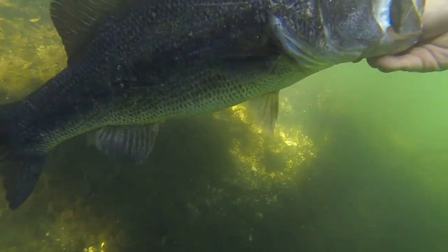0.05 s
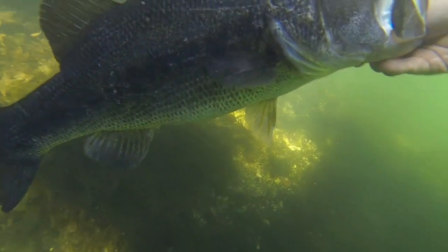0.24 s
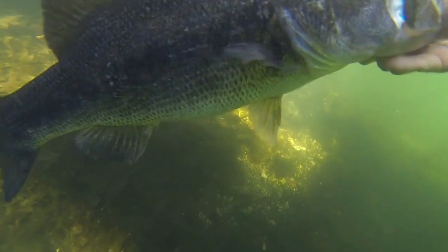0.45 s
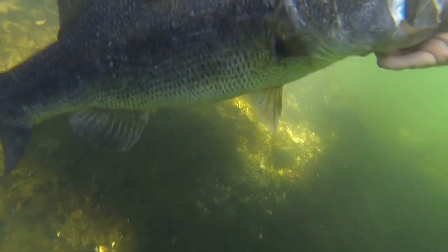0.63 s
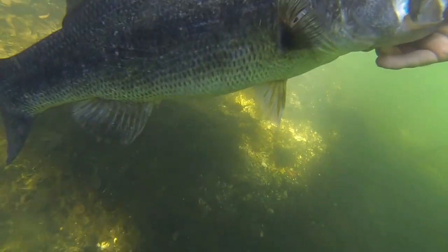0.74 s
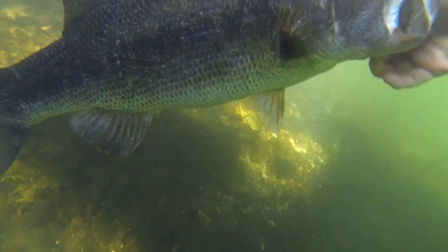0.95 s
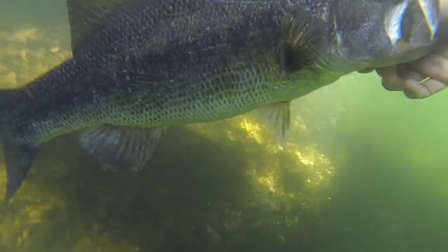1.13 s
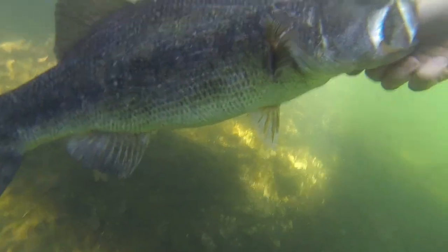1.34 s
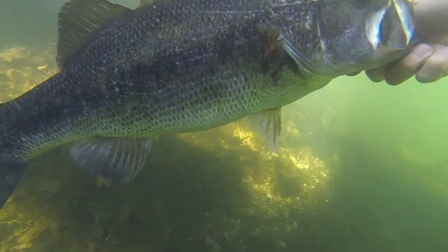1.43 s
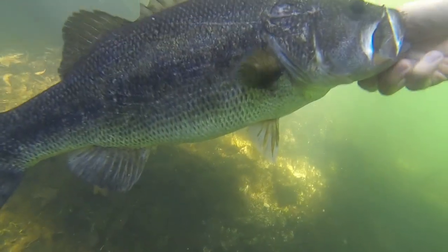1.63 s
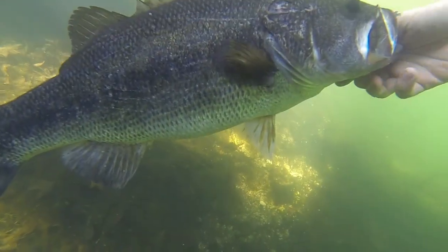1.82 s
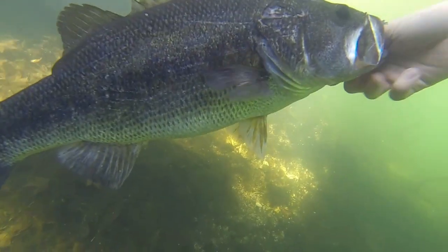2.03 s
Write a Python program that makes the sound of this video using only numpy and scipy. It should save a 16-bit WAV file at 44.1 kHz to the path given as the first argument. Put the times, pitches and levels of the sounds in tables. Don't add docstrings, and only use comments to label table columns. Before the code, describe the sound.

Heard from inside a sealed housing in shallow water: a rattling burst of hard clicks, scattered knocks, a brief finger squeak, scrape and groan, a final solid knock, with deep water rumble and faint hiss throughout.

```python
import sys
import numpy as np
from scipy import signal
from scipy.fft import rfft, irfft
from scipy.io import wavfile
from scipy.ndimage import uniform_filter1d

SR = 44100
rng = np.random.default_rng(int(sys.argv[2]) if len(sys.argv) > 2 else 0)


def unload_audio(sound):
    columns = np.transpose(np.atleast_2d(sound))
    steps = np.round(np.clip(columns, -1, 1) * 32767)
    wavfile.write(sys.argv[1], SR, steps.astype(np.int16))


def boost_factor(decibels):
    exponent = np.asarray(decibels, float) / 20
    return 10 ** exponent


N = 91683

# start_s, level_db, push_or_pull (1 or # -1),
# sharpness_s
THUMPS = [(0, -26, 1, 0.0014), (0.098, -30, 1, 0.00019), (0.157, -27, -1, 0.00089),
          (0.28, -19.5, 1, 0.0019), (0.474, -23, -1, 0.00013), (0.613, -28, -1, 0.0012),
          (0.7281, -28, -1, 0.0004), (0.754, -12.5, -1, 0.012), (.928, -15.5, -1, 0.00057),
          (0.951, -25.5, 1, 0.0014), (1.129, -28, -1, 0.00094), (1.365, -16, 1, 0.0059),
          (1.537, -32, 1, 0.0013), (0.052, -20, 1, 0.011), (0.193, -28.5, 1, 0.0076),
          (.339, -30.5, 1, 0.0079), (0.625, -26, 1, 0.0045), (1.029, -24, -1, 0.0036),
          (1.077, -21.5, -1, 0.0061), (1.123, -19, 1, 0.0074), (1.221, -23, -1, 0.0042),
          (1.286, -19.5, 1, 0.01), (1.35, -26, -1, 0.0027), (1.546, -16.5, 1, 0.012),
          (1.803, -27, -1, 0.0075), (1.841, -30.5, 1, 0.0047), (1.893, -31, -1, 0.0052),
          (1.942, -29, 1, 0.0041)]
SLOSH_HZ, SLOSH_T60_S, SLOSH_DB = 34.1, 0.11, -6
# time_s, level_db
WATER_SWELL = [(0, -35), (.06, -23.5), (.21, -33), (.31, -28), (.5, -36.5), (.72, -24), (.86, -35),
               (1.05, -25), (1.3, -20), (1.44, -24.5), (1.55, -28), (1.68, -33.5), (1.85, -31), (2.08, -36)]
# freq_hz, density_db
WATER_SPECTRUM = [(8.8, 21.5), (15, 16), (91, -10), (113, -27.5), (141, -20), (222, -33), (251, -31.5),
                  (400, -65), (520, -105), (880, -120)]

# start_s, peak_db, ring_hz, middle_modes_db, crack_db
HOUSING_KNOCKS = [(.354, -33, 1880, -17, -9.5), (.387, -34, 1680, 7, -17), (.4424, -23, 2350, -4, -31),
                  (.4532, -10, 2560, -43, -30), (.4568, -18.5, 1540, 2.5, -37),
                  (.4692, -16.5, 3030, -7, -5), (.4743, -20.5, 2370, 20, -29), (.4804, -42, 2890, -3, -1),
                  (.4622, -41, 2900, -2, -25), (.4775, -36, 2850, 3, -14), (.5985, -36.5, 2120, -6, -15),
                  (.5905, -36, 2120, 4, 0.5), (.5955, -31.5, 2250, 15, -10.5),
                  (.6672, -19.5, 2500, 10, -12.5), (.6825, -32.5, 2230, 13, -1),
                  (.6846, -22.5, 1400, -6.5, -15), (.7806, -24.5, 1990, 3.5, -7.5),
                  (1.536, -36, 1410, -11, -24), (1.7478, -11.5, 1603, -3, -39)]
# start_s, peak_db, ring_hz, middle_modes_db, crack_db
FAINT_KNOCKS = [(0.0368, -41, 3480, -8, -9), (0.0712, -43.5, 3000, -8, -8), (0.0635, -47, 2640, -8, -11),
                (0.0964, -42.5, 1150, -22, -27), (0.185, -38.5, 1720, 8.5, -8),
                (0.3292, -36.5, 1350, -9, -17), (0.3362, -46, 1630, 6, -2), (0.3593, -40.5, 1590, 10, -12),
                (0.4009, -40, 2200, -18, -16), (0.4048, -50, 1540, -11, -6), (0.4381, -38, 2350, -3, -41),
                (0.5003, -43.5, 1220, 21, -17), (0.5104, -60, 1550, 5, -5), (0.5537, -54.5, 1530, 6, -21),
                (0.5845, -36, 2440, -15, -19), (0.6364, -40, 1750, -17, -30), (0.7216, -39.5, 930, -15, -30),
                (0.8616, -46, 1410, -3, -11), (0.889, -47.5, 1300, -1, -15), (0.3825, -41, 3300, 5, -10),
                (0.5475, -45.5, 2400, -8, -20), (1.4175, -53, 1600, 6, -25)]
# freq_hz, level_db, t60_s
CASE_MIDDLE_MODES = [(955, -16.5, 0.047), (1300, -45, 0.024), (1540, 16, 0.016), (2060, 28.5, 0.002),
                     (2500, 23.5, 0.0021), (3000, 22, 0.0019), (3080, 9, 0.0028)]
# freq_hz, width_hz, level_db
CASE_BRIGHT_MODES = [(5210, 1800, 6), (6330, 2300, 3), (8190, 950, -4.5), (9740, 1500, -9),
                     (12730, 4000, -28)]
RING_CYCLES, SWELL_CYCLES = 12, 0.92
RATTLE_S, RISE_S, CRACK_S = 0.0019, 0.00013, 0.00062
TAIL_DB, TAIL_T60_S = -16, 0.017
SCATTER_DB = 2.5
CASE_CUT_HZ, CASE_TOP_HZ = 950, 3800

# time_s, level_db
SQUEAK_PRESSURE = [(1.06, -82), (1.08, -56.5), (1.1, -54), (1.124, -33.5), (1.146, -37.5), (1.166, -55.5),
                   (1.187, -53), (1.21, -65.5), (1.26, -75)]
SCRAPE_PRESSURE = [(1.19, -57), (1.226, -51.5), (1.26, -53.5), (1.275, -37), (1.318, -33.5), (1.336, -39.5),
                   (1.378, -37), (1.396, -46), (1.408, -79)]
GROAN_PRESSURE = [(1.34, -62), (1.36, -44), (1.385, -41.5), (1.405, -48.5), (1.418, -72)]
SCUFF_PRESSURE = [(.025, -74), (.045, -62), (.06, -53), (.085, -50.5), (.1, -68)]
# freq_hz, width_hz, level_db
SQUEAK_BODY = [(790, 550, -16.5), (1234, 164, -10), (1511, 104, 2), (1776, 220, -17), (2420, 420, -29.5),
               (3180, 160, -25.5), (3600, 340, -22), (4890, 380, -29.5), (7850, 3800, -48)]
SCRAPE_BODY = [(258, 163, 2), (556, 153, 3), (900, 400, -2.5), (1290, 220, -2), (1600, 240, -4),
               (2330, 470, -13.5), (3300, 400, -10), (3995, 480, -23), (5320, 590, -22.5),
               (9500, 4800, -47)]
GROAN_BODY = [(275, 96, 4), (565, 130, -3), (715, 140, -7)]
SCUFF_BODY = [(352, 380, -2), (660, 330, -7), (1300, 540, -6)]
SLIPS_PER_S, SLIP_SPREAD_DB = 5000, 2

# start_s, pitch_hz, level_db, rise_s, t60_s
HOLLOW_NOTES = [
    (.438, 660, -32, .002, .03),
    (.6105, 660, -37, .002, .035),
    (.727, 600, -38, .001, .015),
    (1.119, 436, -19, .012, .085),
    (1.534, 620, -46, .002, .03),
]
# start_s, peak_db, centre_hz
SNAPS = [
    (0.15, -59, 14000),
    (0.4052, -48.5, 9500),
    (0.4486, -36, 13000),
    (0.4485, -41.5, 12000),
    (.4486, -45, 6500),
    (0.48, -47, 9500),
    (.596, -41.5, 9500),
    (0.781, -33, 8800),
]

# freq_hz, density_db
HISS_SPECTRUM = [(88, 15), (150, -3.5), (718, -15.5), (806, -17), (4960, -31.5), (6500, -31), (8030, -34),
                 (13300, -42), (14000, -37), (15200, -50)]
# freq_hz, width_hz, gain_db
CASE_HUM = [(1550, 320, 3), (3000, 480, 6.5)]
# freq_hz, width_hz, level_db
FIZZ_BODY = [(640, 570, -4), (1600, 410, 2), (2400, 600, -5.5), (3300, 670, -5.5)]
# time_s, level_db
STIR = [(0, 26.5), (.3, 29), (.45, 27), (.8, 22), (1.05, 4), (1.45, -28), (2.08, -31)]
HISS_DB, STIR_DB, FIZZ_PER_S = -65, -88, 4000

WHINE_RESTARTS = [.0046, .3553, .4119, .5496, .5655, .6301, .9141, .9819, 1.0626, 1.2077, 1.2658, 1.339,
                  1.4166, 1.4834, 1.5685, 1.6285, 1.6934, 1.92, 2.0453, 2.0678]
WHINE_HZ, WHINE_DB, OVERTONE_DB = 6443, -66, -9.5
WHINE_EVERY_S, WHINE_ON_S = 0.02085, 0.0082


def curve(table):
    time_s, level_db = np.array(table).T
    return boost_factor(np.interp(np.arange(N) / SR, time_s, level_db, left=-200, right=-200))


def unit(x):
    return x / np.sqrt(np.mean(x ** 2))


def peak(x):
    return x / np.abs(x).max()


def band(x, hz, width_hz):
    return signal.lfilter(*signal.iirpeak(hz, hz / width_hz, fs=SR), x)


def decay(t, t60_s):
    return 1000. ** (-t / t60_s)


def walk(rate_hz):
    hold = int(SR / rate_hz)
    steps = np.repeat(rng.standard_normal(N // 64), hold)[:N]
    return unit(uniform_filter1d(uniform_filter1d(steps, hold), hold))


def coloured(spectrum):
    hz, db = np.array(spectrum).T
    f = np.fft.rfftfreq(N, 1 / SR) + 1
    gain = boost_factor(np.interp(np.log(f), np.log(hz), db, left=-60))
    return irfft(rfft(rng.standard_normal(N)) * gain, N)


def slips(rate_hz):
    on = rng.random(N) < rate_hz / SR
    size = rng.exponential(size=N)
    sign = np.sign(rng.standard_normal(N))
    return unit(on * sign * boost_factor(SLIP_SPREAD_DB * size))


def add(out, start_s, x):
    i = max(int(start_s * SR), 0)
    out[i:i + len(x)] += x[:N - i]


def thumps():
    out = np.zeros(N)
    lead = 4410
    t = np.arange(-lead, 13230) / SR
    for start_s, db, sign, sharp_s in THUMPS:
        scaled = np.where(t < 0, t / sharp_s, t / (0.45 * sharp_s))
        cusp = 1 / np.cosh(np.clip(scaled, -50, 50))
        swing = -np.sin(2 * np.pi * SLOSH_HZ * t) * decay(t, SLOSH_T60_S) * (t > 0) * (1 - cusp)
        thump = boost_factor(db) * np.sign(sign) * (cusp + boost_factor(SLOSH_DB) * swing)
        cut = max(lead - int(start_s * SR), 0)
        add(out, start_s + t[cut], thump[cut:])
    return out


def water():
    rumble = coloured(WATER_SPECTRUM) * boost_factor(1.46 * walk(11.03))
    return unit(rumble) * curve(WATER_SWELL)


def knocks(rows):
    out, bright = np.zeros(N), np.zeros(N)
    t = np.arange(2048) / SR
    rise = 1 - np.exp(-(t / RISE_S) ** 2)

    def ring(hz, t60_s):
        return np.sin(2 * np.pi * hz * t) * decay(t, t60_s) * rise

    for start_s, db, hz, middle_db, crack_db in rows:
        contact = rng.standard_normal(256)
        luck = rng.standard_normal((2, 16))
        tail_noise, crack_noise = rng.standard_normal((2, 2048))

        rattle = contact ** 3 * np.exp(-t[:256] / RATTLE_S) * 0.093
        contact = rattle + (t[:256] == 0)
        case = sum(boost_factor(g + SCATTER_DB * a) * ring(f * (1 + 0.01 * b), t60_s)
                   for (f, g, t60_s), a, b in zip(CASE_MIDDLE_MODES, *luck))
        middle = peak(np.convolve(case, contact)[:len(t)])
        build_up = 1 - np.exp(-(t * hz / SWELL_CYCLES) ** 2)
        main = peak(ring(hz, RING_CYCLES / hz) * build_up)
        body = peak(main + boost_factor(middle_db) * middle)

        tail = boost_factor(TAIL_DB) * unit(band(tail_noise, 2200, 2000)) * decay(t, TAIL_T60_S) * rise
        burst = crack_noise * np.exp(-t / CRACK_S) * rise
        crack = sum(boost_factor(g + SCATTER_DB * a) * band(band(burst, f, w), f, w)
                    for (f, w, g), a in zip(CASE_BRIGHT_MODES, luck[0, 8:]))
        add(out, start_s, boost_factor(db) * (body + tail))
        add(bright, start_s, boost_factor(db + crack_db) * peak(crack))
    case_filter = signal.butter(4, [CASE_CUT_HZ, CASE_TOP_HZ], "band", fs=SR, output="sos")
    return signal.sosfilt(case_filter, out) + bright


def rub(pressure, body):
    clicks = slips(SLIPS_PER_S)
    out = np.zeros(N)
    for k, (hz, width_hz, db) in enumerate(body):
        level = boost_factor(db + walk(59.17))
        mode = clicks
        for _ in range(3):
            mode = band(mode, hz, 2 * width_hz)
        out += (-1) ** k * level * unit(mode) * np.sqrt(width_hz / 100)
    return unit(out) * curve(pressure)


def hollow():
    out, waver = np.zeros(N), walk(51.0)
    for start_s, hz, db, rise_s, t60_s in HOLLOW_NOTES:
        t = np.maximum(np.arange(N) / SR - start_s, 0)
        envelope = (1 - np.exp(-(t / rise_s) ** 2)) * decay(t, t60_s)
        out += boost_factor(db) * envelope * np.sin(2 * np.pi * hz * t + 0.9 * waver)
    return out


def snaps():
    out, t = np.zeros(N), np.arange(512) / SR
    for start_s, db, hz in SNAPS:
        burst = rng.standard_normal(len(t)) * np.exp(-t / CRACK_S) * (1 - np.exp(-t / RISE_S))
        add(out, start_s, boost_factor(db) * peak(band(band(burst, hz, hz / 2), hz, hz / 2)))
    return out


def hiss_and_fizz():
    noise, clicks = coloured(HISS_SPECTRUM), slips(FIZZ_PER_S)
    noise = noise / np.std(band(noise, 1300, 3000)) * boost_factor(HISS_DB + 0.8 * walk(14))
    hiss = noise + sum((boost_factor(db) - 1) * band(noise, hz, w) for hz, w, db in CASE_HUM)
    fizz = unit(sum(boost_factor(db) * unit(band(band(clicks, hz, w), hz, w)) for hz, w, db in FIZZ_BODY))
    return hiss + fizz * boost_factor(STIR_DB + 0.89 * walk(15.4)) * curve(STIR)


def whine():
    t, starts = np.arange(N) / SR, np.array(WHINE_RESTARTS)
    since_s = t - starts[np.maximum(np.searchsorted(starts, t) - 1, 0)]
    gate = uniform_filter1d(1. * (since_s % WHINE_EVERY_S < WHINE_ON_S), size=30)
    phase = 2 * np.pi * WHINE_HZ * t + 1.3 * walk(25)
    tone = np.sin(phase) + boost_factor(OVERTONE_DB) * np.sin(2 * phase)
    return np.sqrt(2) * boost_factor(WHINE_DB) * gate * tone


def scene():
    mix = water() + thumps()
    mix += knocks(HOUSING_KNOCKS) + knocks(FAINT_KNOCKS)
    mix += rub(SQUEAK_PRESSURE, SQUEAK_BODY) + rub(SCRAPE_PRESSURE, SCRAPE_BODY)
    mix += hollow() + snaps()
    mix += hiss_and_fizz() + whine()
    mix += rub(GROAN_PRESSURE, GROAN_BODY) + rub(SCUFF_PRESSURE, SCUFF_BODY)
    return mix[None]


def roll_off(x):
    return signal.sosfilt(signal.butter(12, 15350, fs=SR, output="sos"), x)


def record(dry):
    bass_cut = signal.butter(1, 12, "high", fs=SR, output="sos")
    mix = signal.sosfilt(bass_cut, dry)
    return roll_off(mix)


dry = scene()
out = record(dry)
unload_audio(out)
```